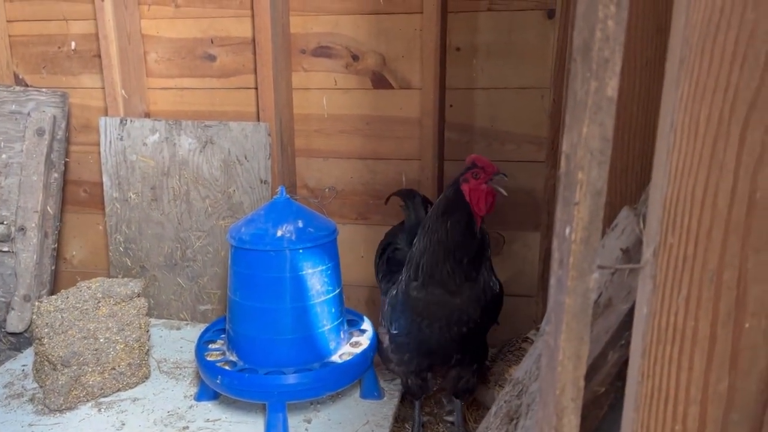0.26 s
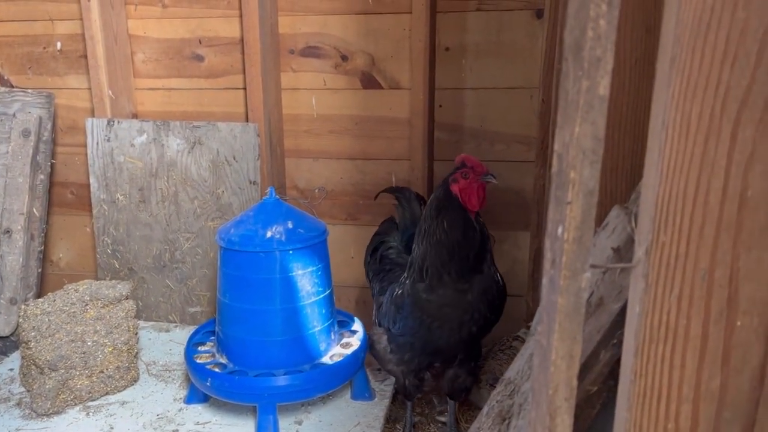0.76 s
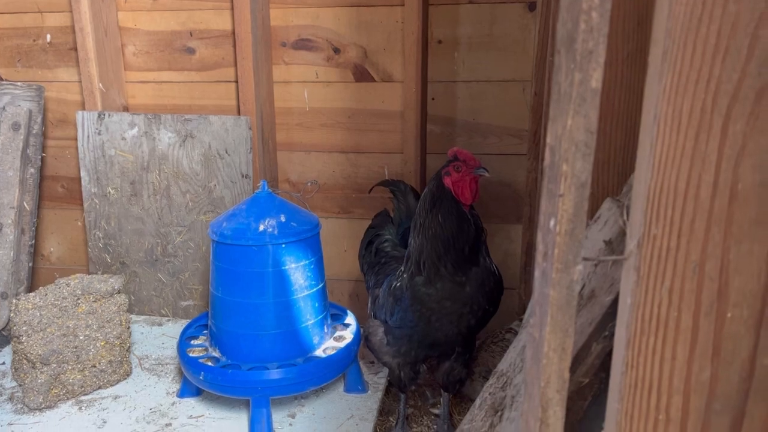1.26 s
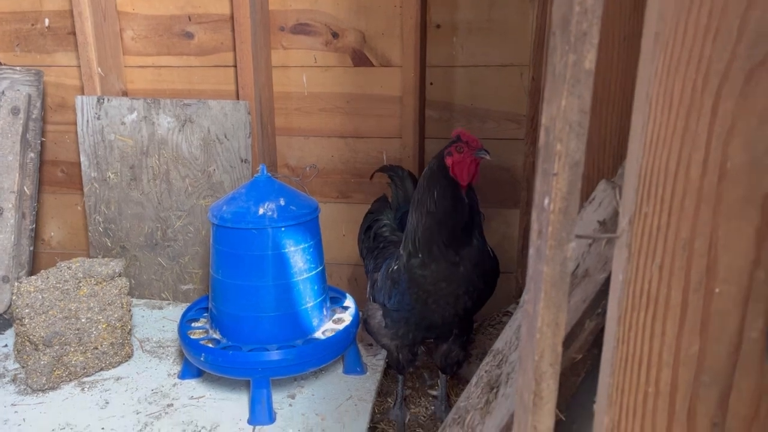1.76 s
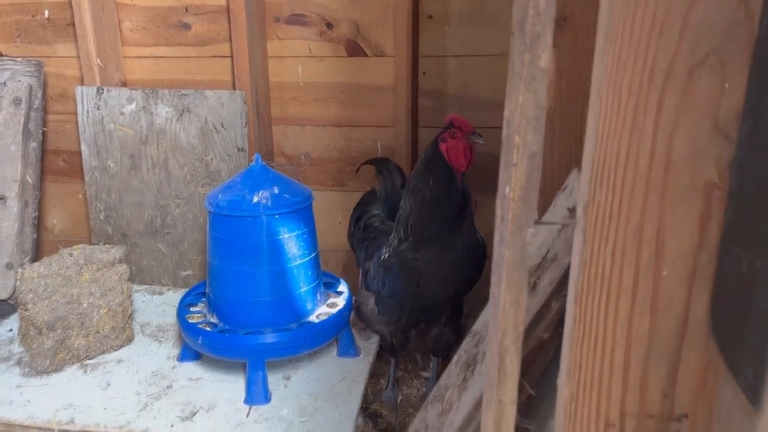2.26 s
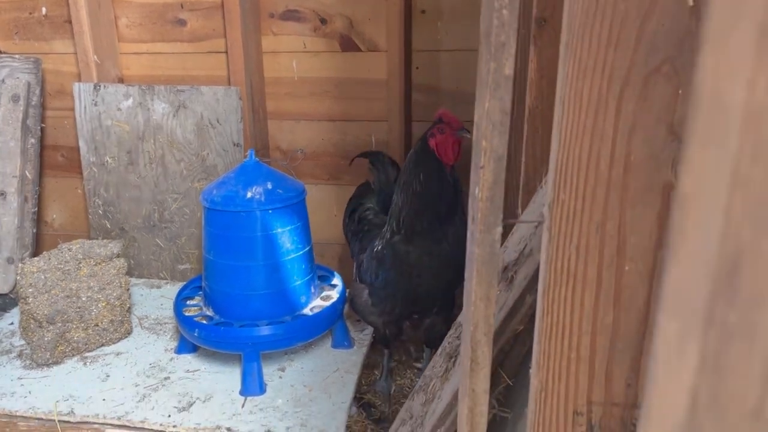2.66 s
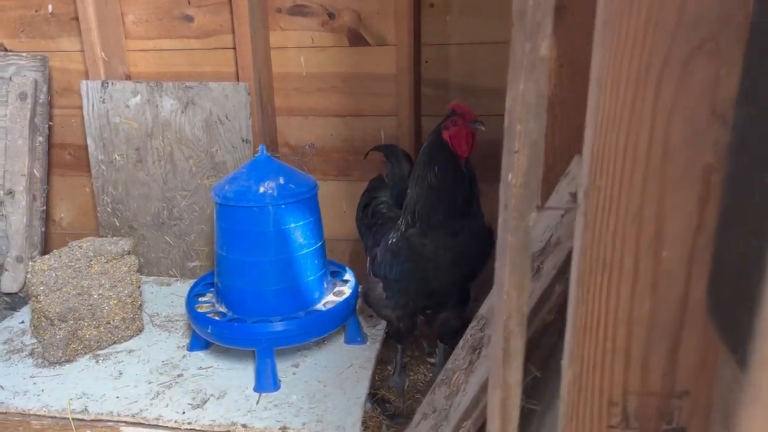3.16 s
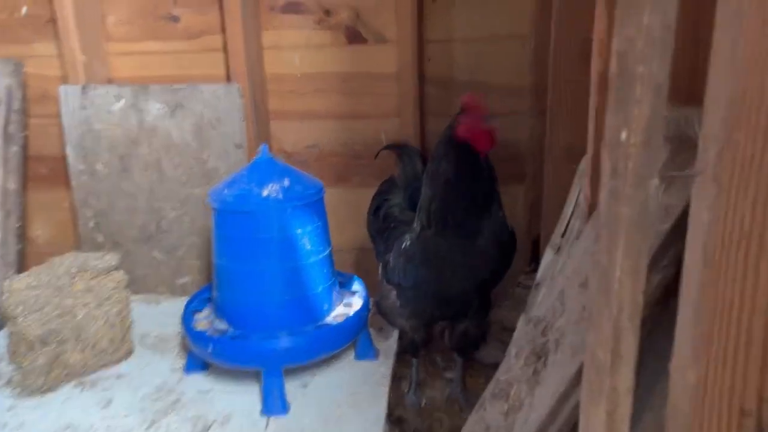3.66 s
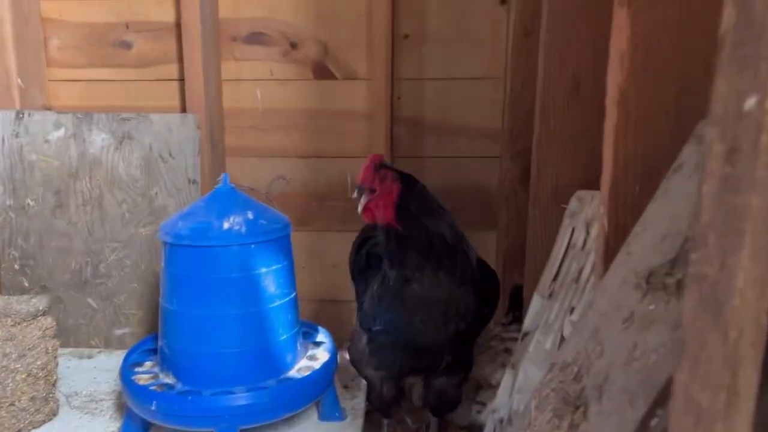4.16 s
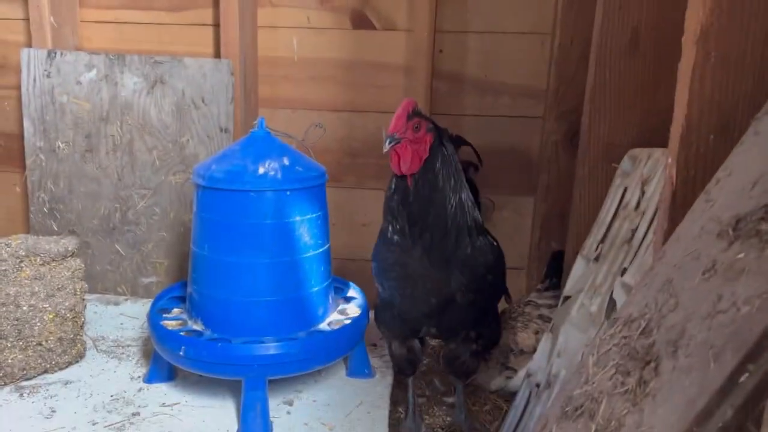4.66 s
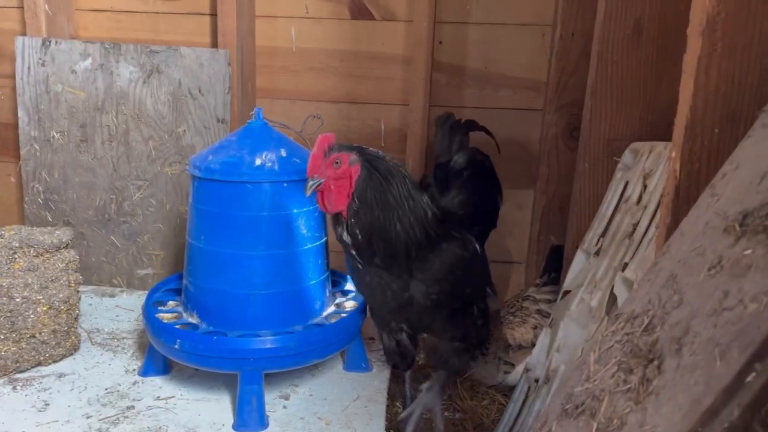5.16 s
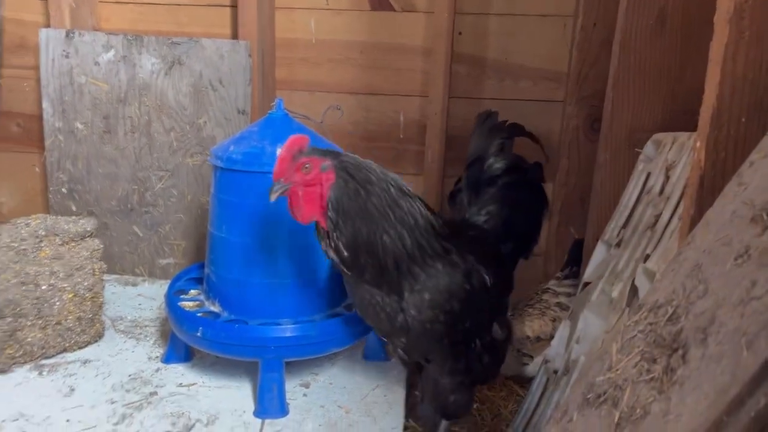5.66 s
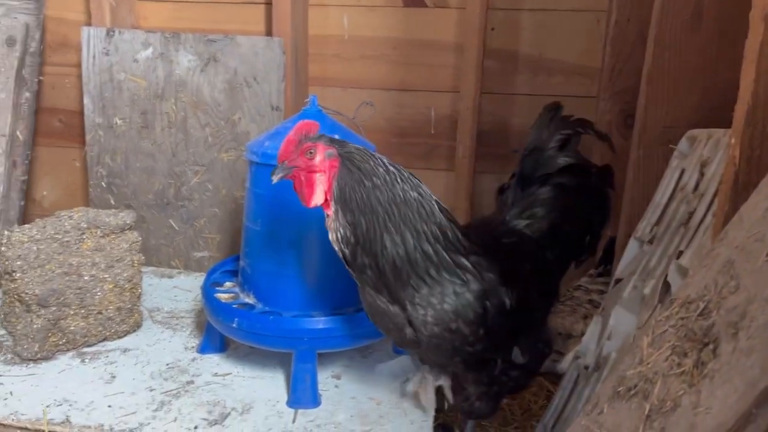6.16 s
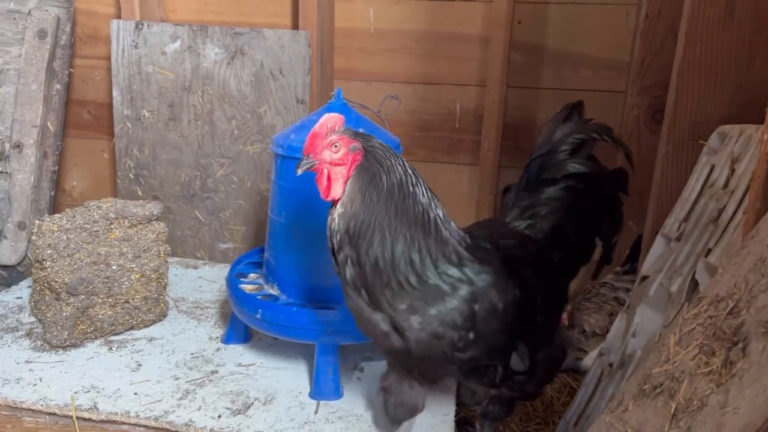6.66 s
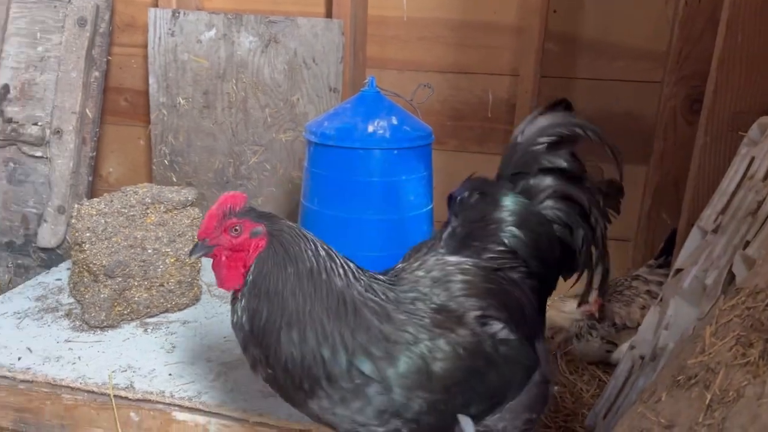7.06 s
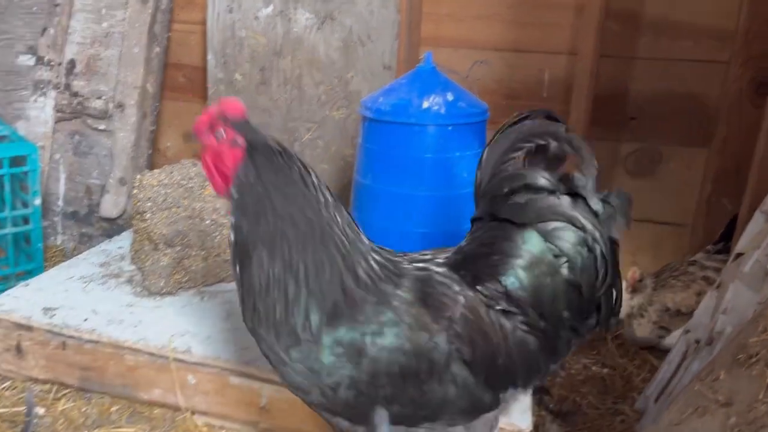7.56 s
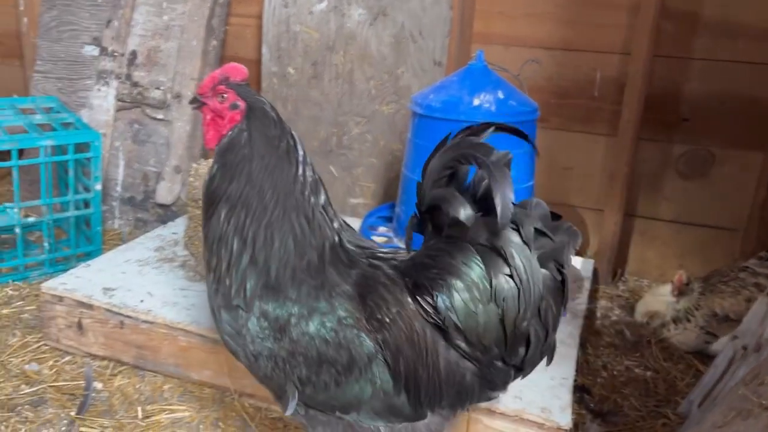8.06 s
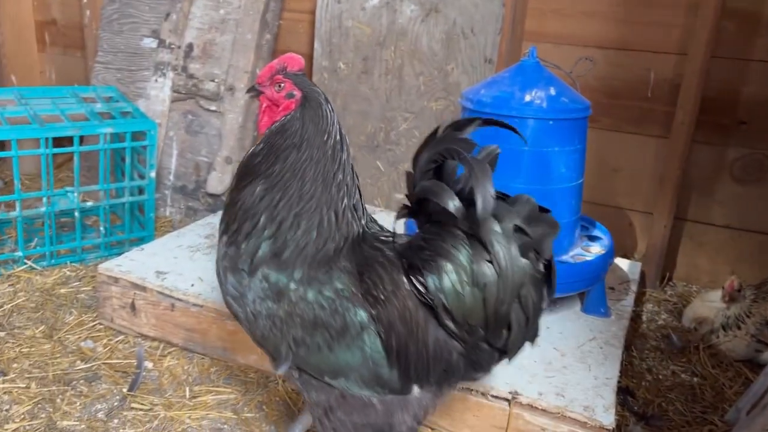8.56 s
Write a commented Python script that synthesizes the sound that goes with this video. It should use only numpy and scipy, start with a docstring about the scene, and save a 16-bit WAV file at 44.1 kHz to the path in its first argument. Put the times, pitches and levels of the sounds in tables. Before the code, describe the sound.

A rooster in a small wooden coop gives low pulsed clucks and five loud alarm squawks, with soft thuds and litter rustle between.

```python
"""A rooster sounds his alarm in a small plank coop: a low pulsed cluck, then a loud squawk that scoops up,
holds a clear note and breaks into a croak. In the pause boards thud, litter rustles and far birds call thinly.
Clucks lead into four more squawks, with claw ticks and footfalls between; thuds and rustle close.
Voice: pulse trains through throat filters and summed partials. Footing: noise bursts and ringing boards.
Background: filtered noise, random snaps and gliding sines. Coop: echoes, resonances and a diffuse tail."""
import sys
import numpy as np
from scipy import signal
from scipy.fft import rfft, irfft
from scipy.io import wavfile

SR = 44100
rng = np.random.default_rng(int(sys.argv[2]) if len(sys.argv) > 2 else 0)


def inscribe(sig):
    """Save sig as 16-bit PCM at rate SR to the path in sys.argv[1].

    A 1-D sig is mono; a 2-D sig holds one channel per row.
    Samples are clipped to [-1, 1] before scaling.
    """
    pcm = np.round(np.clip(np.atleast_2d(sig).T, -1, 1) * 32767)
    wavfile.write(sys.argv[1], SR, pcm.astype(np.int16))


N = 387638  # samples


def from_db(db):
    """Amplitude factor of a level in dB."""
    return 10 ** (np.asarray(db) / 20)


def rms_one(x):
    """Scale to rms 1."""
    return x / np.sqrt(np.mean(x ** 2) + 1e-20)


def at_hz(points, hz):
    """Read a table on a log-frequency axis."""
    f, value = np.transpose(points)
    return np.interp(np.log(np.maximum(hz, 1)), np.log(f), value)


def colour(x, spectrum):
    """Causal minimum-phase filter that follows a spectrum and falls away below it; rms 1."""
    size = 2048
    hz = np.arange(size + 1) * SR / (2 * size)
    low_cut = np.clip(hz / spectrum[0][0], .05, 1) ** 2
    gain = from_db(at_hz(spectrum, hz)) * low_cut
    cepstrum = irfft(np.log(gain))[:size]
    cepstrum[1:] *= 2
    response = irfft(np.exp(rfft(cepstrum, 2 * size)))[:size]
    return rms_one(signal.fftconvolve(x, response)[:len(x)])


def wander(n, knots_per_s):
    """Random motion of rms 1: straight lines between random knots."""
    knots = np.arange(n) * knots_per_s / SR
    return rms_one(np.interp(knots, np.arange(n), rng.standard_normal(n)))


def filtered(x, order, hz, kind):
    """Butterworth filter."""
    return signal.sosfilt(signal.butter(order, hz, kind, fs=SR, output="sos"), x)


def resonate(x, hz, width_hz):
    """Two-pole resonance with gain 1 at its centre."""
    r = np.exp(-np.pi * width_hz / SR)
    zeros = np.array([1, 0, -1]) * (1 - r * r) / 2
    poles = [1, -2 * r * np.cos(2 * np.pi * hz / SR), r * r]
    return signal.lfilter(zeros, poles, x)


def stereo_noise(n, width):
    """White noise, alike in both ears in the bass and less related above."""
    mid, side = rng.standard_normal((2, n))
    side = filtered(side, 1, 450, "high")
    return (mid + width * side * [[1], [-1]]) / np.sqrt(1 + width ** 2)


def add(out, start_s, sound, pan_db=0):
    """Mix a mono or stereo sound into both channels; positive pan is left."""
    i = round(start_s * SR)
    sound = sound[..., max(-i, 0):N - i]
    out[:, max(i, 0):max(i, 0) + sound.shape[-1]] += sound * from_db([[pan_db / 2], [-pan_db / 2]])


# decay time of the coop's tail: (frequency [Hz], T60 [s])
COOP_DECAY = [(100, 0.57), (600, 0.43), (2000, 0.37), (5000, 0.31), (14000, 0.3)]


def coop(x, tail_db, build_s=0.021):
    """A short diffuse tail, its bands dying at different rates."""
    t = np.arange(int(.7 * SR)) / SR
    noise = stereo_noise(len(t), width=0.94)
    edges_hz = np.geomspace(80, 16000, 9)
    tail = np.zeros_like(noise)
    for band in zip(edges_hz, edges_hz[1:]):
        t60_s = at_hz(COOP_DECAY, np.sqrt(np.prod(band)))
        tail += filtered(noise, 2, band, "band") * from_db(-60 * t / t60_s)
    response = from_db(tail_db) * rms_one(tail * np.minimum(1, t / build_s)) / np.sqrt(len(t))
    return x + signal.fftconvolve(x, response, axes=1)[:, :N]


# standing waves between the walls: (frequency [Hz], width [Hz], level [dB])
STANDING_WAVES = [(249, 66, -2), (457.3, 90, -8), (516, 11, -5), (620, 40, -3.5), (830, 10, -5.5),
                  (978, 66, -3.5), (1777, 39, -4.5)]
# echoes off the nearest planks: (left delay [s], right delay [s], level [dB])
PLANK_ECHOES = [(.0021, 0.0025, -3), (.0053, 0.0049, -6.5), (.0088, 0.011, -12)]


def planks(x, scatter_db=-5, scatter_s=0.037):
    """Plank echoes, scatter off the clutter and standing waves smear every short sound."""
    t = np.arange(SR // 5) / SR
    scatter = stereo_noise(len(t), width=0.36) * np.exp(-t / scatter_s) * np.minimum(1, t / 0.0065)
    scatter = filtered(scatter, 1, 700, "high")  # low notes pass the clutter by
    response = from_db(scatter_db) * rms_one(scatter) / np.sqrt(len(t))
    for hz, width_hz, db in STANDING_WAVES:
        response += from_db(db) * resonate(signal.unit_impulse(len(t)), hz, width_hz)
    for left_s, right_s, db in PLANK_ECHOES:
        response[[0, 1], [round(left_s * SR), round(right_s * SR)]] += from_db(db)
    return x + signal.fftconvolve(x, response, axes=1)[:, :N]


# calls of birds further off:
# (start [s], length [s], first pitch [Hz], last pitch [Hz], level [dB], quaver [rms share of pitch])
FAR_CALLS = [(0.548, 0.22, 2640, 3270, -71.5, 0.095), (1.048, 0.064, 2110, 2000, -75, 0.019),
             (1.204, 0.17, 2185, 2820, -71.5, 0.1), (1.323, 0.24, 3010, 2430, -72, .08),
             (2.8, 0.11, 3066, 3560, -74, 0.034), (4.861, 0.16, 2060, 1936, -63.5, 0.0077),
             (5.004, 0.34, 2500, 3176, -62.5, 0.092), (8.6, 0.11, 3350, 2695, -66, 0.025)]


def far_birds():
    """Thin sine glides whose pitch quavers at random."""
    out = np.zeros((2, N))
    for start_s, length_s, first_hz, last_hz, db, quaver in FAR_CALLS:
        n = int(length_s * SR)
        pitch_hz = np.linspace(first_hz, last_hz, n) * (1 + quaver * wander(n, 490))
        swell = np.sqrt(2 * np.hanning(n))
        add(out, start_s, from_db(db) * swell * np.sin(2 * np.pi * np.cumsum(pitch_hz) / SR))
    return out


# stirring, set in the pauses between calls, before trims:
# groups of (time [s], rumble level [dB], rustle level [dB])
STIRRING = [
    [(0.6, -77, -74.5), (0.986, -79, -81.5), (1.6, -77.5, -79.5)],
    [(2.65, -69, -79), (3.13, -67, -69), (3.8, -72, -70.5)],
    [(4.9, -74.5, -70.5), (5.16, -78, -73.5), (5.45, -67, -67)],
    [(6.3, -72, -73.5), (6.644, -64.5, -62.5), (7.2, -73, -66)],
    [(8.15, -66.5, -66), (8.304, -62.5, -77), (8.79, -73.5, -69.5)],
]


def stirring_db(column):
    """Level curve of one kind of stirring, straight between its points."""
    curve = np.vstack(STIRRING)
    return np.interp(np.arange(N) / SR, curve[:, 0], curve[:, column])


def bed(spectrum, width, flicker_db, flicker_per_s):
    """Coloured stereo noise whose level flickers."""
    mid, side = (colour(rng.standard_normal(N), spectrum) for _ in range(2))
    return (mid + width * side * [[1], [-1]]) * from_db(flicker_db * wander(N, flicker_per_s))


# colour of the rumble: (frequency [Hz], level [dB])
RUMBLE_COLOUR = [(15, -42), (25, -17.5), (55, -3), (107, -6), (321, -12), (484, -19.5), (605, -17),
                 (730, -25.5), (852, -32.5), (1500, -26), (1950, -60), (3300, -120)]


def rumble():
    """Stirring in the coop as flickering low noise."""
    noise = bed(RUMBLE_COLOUR, width=.3, flicker_db=3.0, flicker_per_s=22)
    return from_db(stirring_db(1) + 4) * noise


# colour of the litter: (frequency [Hz], level [dB])
RUSTLE_COLOUR = [(470, -36.5), (800, -3), (4270, -2.5), (7180, -11), (8550, -37.5), (9440, -10),
                 (11900, -10.5), (14400, -14), (15500, -52.5)]
STRAWS_PER_S, STRAW_SPREAD_DB, STRAW_DB = 280, 6, -3.5  # rate before clumping; level relative to rustle


def straws():
    """Straws crackle: tiny snaps of uneven size, in clumps."""
    rate_per_s = STRAWS_PER_S * from_db(6 * wander(N, 12))
    snaps = rng.random((2, N)) < rate_per_s / SR
    sizes = from_db(STRAW_SPREAD_DB * np.minimum(rng.exponential(1, (2, N)), 4))
    left, right = snaps * sizes * rng.choice([-1, 1], (2, N))
    ears = [colour(left + .5 * right, RUSTLE_COLOUR), colour(right + .5 * left, RUSTLE_COLOUR)]
    return from_db(STRAW_DB) * np.array(ears)


def rustle():
    """Litter rustles as flickering noise plus straw snaps."""
    noise = bed(RUSTLE_COLOUR, width=.7, flicker_db=2.0, flicker_per_s=35)
    return from_db(stirring_db(2) - 0.2) * (noise + straws())


def burst(n_s, spectrum, rise_s, decay_s):
    """Contact as a burst of coloured noise that dies away."""
    t = np.arange(n_s) / SR
    noise = colour(rng.standard_normal(len(t)), spectrum)
    return noise * (1 - np.exp(-t / rise_s)) * np.exp(-t / decay_s)


# claw ticks and snapping straw, before trim: (time [s], level [dB])
CLAW_TICKS = [(2.715, -42), (3.017, -39), (3.041, -39.5), (3.67, -39.5), (5.318, -30.5), (5.334, -26.5),
              (6.389, -25), (6.447, -24.5), (6.568, -35), (6.779, -40)]
# their colour: (frequency [Hz], level [dB])
CLAW_COLOUR = [(400, -10), (1200, -7.5), (2500, -2), (4000, 0), (6500, -12), (8500, -25), (11500, -16),
               (15500, -16)]


def ticks(trim_db=-8):
    """Each tick is a very short burst of noise."""
    out = np.zeros((2, N))
    for start_s, db in CLAW_TICKS:
        tick = burst(SR // 4, CLAW_COLOUR, rise_s=0.0023, decay_s=0.0046)
        add(out, start_s, from_db(db + trim_db) * tick)
    return out


# footfalls on the boards, before trims: (time [s], level [dB], board note [Hz])
FOOTFALLS = [(0.633, -47, 259), (2.719, -44, 119.4), (3.033, -41, 105), (3.192, -41, 150),
             (3.238, -41.5, 101), (5.228, -43.5, 199.2), (6.585, -41, 110.2), (6.649, -44, 58),
             (6.781, -36, 254), (7.1, -49.5, 59.25), (7.171, -47, 115.1), (8.14, -44, 150.3)]
# colour of the dull burst: (frequency [Hz], level [dB])
FOOTFALL_COLOUR = [(18, -34), (30, -7.5), (113, 2), (173, -6), (297, -6.5), (439, -24.5), (730, -17),
                   (846, -47), (996, -24.5), (1500, -25.5), (1950, -71.5), (3300, -120)]
BURST_DB, BOARD_RING_DB, BOARD_DECAY_S = -2.0, -3.5, .05


def boards():
    """A footfall gives a dull burst and rings a board's lowest note; little sounds below that note."""
    out, t = np.zeros((2, N)), np.arange(SR // 2) / SR
    for start_s, db, hz in FOOTFALLS:
        thud = burst(len(t), FOOTFALL_COLOUR, rise_s=0.0033, decay_s=.035)
        thud = filtered(thud, 2, hz / 2, "high")
        ring = np.sin(2 * np.pi * hz * t) * (1 - np.exp(-t / .009)) * np.exp(-t / BOARD_DECAY_S)
        add(out, start_s, from_db(db) * (from_db(BURST_DB) * thud + from_db(BOARD_RING_DB) * ring))
    return out


def syrinx(pitch_hz, jitter, air):
    """Membranes slap once a cycle, unevenly, and let through a puff of air; gives pulses and phase."""
    n = len(pitch_hz)
    uneven_hz = pitch_hz * (1 + jitter * wander(n, np.mean(pitch_hz)))
    phase = 2 * np.pi * np.cumsum(uneven_hz) / SR
    orders = np.arange(1, int(SR / 2 / pitch_hz.max()))[:, None]
    slaps = rms_one(np.cos(orders * phase).sum(0))
    puffs = rms_one(rng.standard_normal(n) * (1 + np.cos(phase)) ** 2)
    return slaps + air * puffs, phase


def beak(hz, centre_hz, boost_db, width_hz):
    """A resonance or hollow of the throat and open beak, in dB."""
    return boost_db / (1 + ((hz - centre_hz) / width_hz) ** 2)


# throat colour in a cluck: (frequency [Hz], level [dB])
CLUCK_COLOUR = [(150, -12), (235, -8), (320, -10.5), (450, -5), (620, 4), (900, -5), (1150, -5.5),
                (1450, -21), (2500, -21), (3300, -21.5), (4300, -36), (6500, -37.5), (8300, -60),
                (11000, -40.5), (15000, -56)]


def cluck(length_s, pulse_hz, beak_hz, boost_db, jitter=.05, air=0.77, dull_hz=1500, shut_db=8):
    """A short run of pulses; the beak opens and shuts, so the middle is highest and brightest."""
    u = np.linspace(0, 1, int(length_s * SR))
    arch = np.sin(np.pi * u ** 1.25).clip(0)
    hz = np.geomspace(150, 16000, 150)
    throat = np.c_[hz, at_hz(CLUCK_COLOUR, hz) + beak(hz, beak_hz, boost_db, width_hz=230)]
    pulses, _ = syrinx(pulse_hz * (.86 + .16 * arch), jitter, air * arch)
    voice = colour(pulses, throat)
    # the windpipe keeps ringing from one pulse to the next
    voice = rms_one(voice + from_db(1) * resonate(voice, 550, 150))
    dull = filtered(voice, 1, dull_hz, "low")
    bright = from_db(-shut_db * (1 - arch))
    envelope = (0.067 + arch) * np.minimum(1, (1 - u) * 20)
    return (dull * (1 - bright) + voice * bright) * envelope


# strain at the start of each note, sharp and mostly louder, eases on to the held pitch
STRAIN_S, EASE_S, STRAIN_UPPER_DB = .088, .014, 4.5
# a last push before the voice breaks
PUSH_S, PUSH_HZ, PUSH_DB = .02, 7, 3.5
WAVER_DB, WAVER_PER_S = 4.33, 14  # of the fundamental: rms, knots per s


def held_note(t, length_s, hz, sharp_hz, first_db, first_strain_db, octave_db, octave_strain_db, upper_db):
    """Strain, ease and push; gives pitch and levels of fundamental, octave and upper partials."""
    strain = (1 - np.tanh((t - STRAIN_S) / (2 * EASE_S))) / 2
    push = np.exp(np.minimum(t - length_s, 0) / PUSH_S)
    return (hz + sharp_hz * strain + PUSH_HZ * push,
            first_db + first_strain_db * strain + WAVER_DB * wander(len(t), WAVER_PER_S),
            octave_db + octave_strain_db * strain + PUSH_DB * push,
            upper_db + STRAIN_UPPER_DB * strain + PUSH_DB * push)


# throat colour of the held note: (frequency [Hz], level [dB])
HELD_COLOUR = [(1800, -4.5), (2100, -2.5), (2800, -5), (3500, -2.5), (4200, -14), (4900, -8.5), (5600, -17),
               (6400, -18), (7200, -28), (8300, -43.5), (9700, -27.5), (12000, -30), (14300, -37),
               (15500, -56)]
# the beak closes through the note: its resonance sinks and the top dulls
BEAK_OPEN_HZ, BEAK_SINK_HZ_PER_S, DULLING_DB_PER_OCTAVE_S = 2600, 1200, 9
UPPER_THROAT_HZ = 4640


def upper_partials(t, pitch_hz, orders, level_db, hollow_hz, ring_db):
    """Throat and beak shape the overtones above the octave."""
    hz = orders * pitch_hz
    beak_hz = BEAK_OPEN_HZ - BEAK_SINK_HZ_PER_S * t
    shape_db = at_hz(HELD_COLOUR, hz) + beak(hz, beak_hz, boost_db=6.0, width_hz=1000)
    shape_db += beak(hz, UPPER_THROAT_HZ, ring_db, width_hz=260)
    shape_db -= DULLING_DB_PER_OCTAVE_S * t * np.log2(orders)
    # the throat swallows one overtone, as its hollow moves a little
    moving_hz = hollow_hz + 80 * wander(len(t), 5)
    shape_db += beak(hz, moving_hz, boost_db=-12, width_hz=170)
    upper = from_db(shape_db)
    return upper * from_db(level_db) / np.sqrt((upper ** 2).sum(0))


def two_ears(partials, orders, phase, pitch_hz, late_ms, pan_db):
    """Gliding through standing waves, each overtone swells and turns differently at each ear."""
    n = len(phase)
    motion = np.array([[wander(n, 15) for _ in orders] for _ in range(2)])
    swell, turn = motion * np.minimum(1, orders / 4)
    ear = np.array([1, -1])[:, None, None] / 2
    lead = 2 * np.pi * pitch_hz * late_ms / 1000 + 1.1 * turn
    partials[2:] *= from_db(5 * np.tanh([wander(n, 18) for _ in orders[2:]]))
    # the throat delays each partial differently, which flattens the peaks
    spread = rng.uniform(0, 2 * np.pi, orders.shape)
    spread[:2, 0] = 0, np.pi / 2
    gain = from_db(ear * (pan_db / np.sqrt(orders) + 6.5 * swell))
    waves = partials * gain * np.cos(orders * phase + spread + ear * lead)
    return np.sqrt(2) * waves.sum(1) / np.sqrt((gain[:, 0] ** 2).mean(0))


# throat colours of the rough start and end: (frequency [Hz], level [dB])
SCOOP_COLOUR = [(700, -8), (1100, -2), (1450, -4), (1950, 2), (2400, -9), (3300, -2), (4100, -11),
                (5500, -16.5), (7000, -24), (8300, -43.5), (10000, -29.5), (12500, -35), (15500, -55)]
CROAK_COLOUR = [(300, -19), (470, -5), (640, 6.5), (780, -5.5), (1200, -10.5), (1650, -6.5), (2100, -15.5),
                (2500, -15.5), (3300, -19.5), (4200, -27.5), (5700, -31.5), (8300, -60), (11000, -47.5),
                (15500, -67)]


def squawk(start_s, break_s, scoop_db, rasp_db, croak_db, late_ms, *note,
           scoop_s=.042, scoop_drop=.26, croak_s=.036, croak_drop=0.2):
    """A rough scoop settles into a clean note, which collapses into a croak; gives tone and rough part."""
    length_s = break_s - start_s
    t = np.arange(int((length_s + croak_s) * SR)) / SR
    *voice, hollow_hz, ring_db, pan_db = note
    held_hz, first_db, octave_db, upper_db = held_note(t, length_s, *voice)
    scoop = np.clip(1 - t / scoop_s, 0, 1)
    broken = np.clip((t - length_s) / croak_s, 0, 1)
    pitch_hz = held_hz * (1 - scoop_drop * scoop ** 1.3 - croak_drop * broken ** .6)

    # the membranes are unsteady at first, lock in, and let go at the end
    unsteady = np.exp(-t / 0.051)
    let_go = np.minimum(1, broken * 4)
    jitter = .003 + .025 * unsteady + .05 * scoop + .1 * let_go
    pulses, phase = syrinx(pitch_hz, jitter, .55 * unsteady + .7 * let_go)

    orders = np.arange(1, 22)[:, None]
    first = from_db(first_db + (scoop_db - first_db) * np.minimum(1, scoop * 3))
    octave = from_db(octave_db) * (1 - scoop) ** 2
    upper = upper_partials(t, pitch_hz, orders[2:], upper_db, hollow_hz, ring_db) * (1 - scoop)
    partials = np.vstack([first, octave, upper])
    tone = two_ears(partials, orders, phase, pitch_hz, late_ms, pan_db)

    # air hisses between the partials, less as the note steadies
    puffs = rng.standard_normal(len(t)) * (1 + np.cos(phase))
    hiss = colour(puffs, SCOOP_COLOUR) * from_db(upper_db - 4.5) * (unsteady + 0.011)
    rasp = from_db(rasp_db) * np.minimum(1, scoop * 0.95) * colour(pulses, SCOOP_COLOUR)
    croak = from_db(croak_db) * let_go * np.sqrt(1 - broken ** 2) * colour(pulses, CROAK_COLOUR)
    attack = np.minimum(1, t / .014)
    flutter = from_db(5 * np.sqrt(unsteady) * (np.minimum(wander(len(t), 150), 1) - 0.35))
    return tone * flutter * (1 - let_go) * attack, (hiss + rasp + croak) * attack


# clucks: (start [s], length [s], level [dB], nominal pulse rate [Hz], beak resonance [Hz],
#          its boost [dB], left over right [dB])
CLUCK_CALLS = [(-0.025, 0.075, -20, 470, 1962, 13.5, 1.5), (1.641, 0.068, -26, 193.7, 1885, 20.5, -0.5),
               (1.862, 0.089, -20.5, 215.8, 1868, 21.5, 1.5), (2.417, 0.066, -27.5, 190.8, 1830, 19.5, 1),
               (3.827, 0.058, -28, 221.1, 1730, 16.5, 0.5), (4.056, 0.059, -16.5, 216.3, 2012, 17.5, -1.5),
               (4.614, 0.057, -20, 216.6, 2090, 19, -0.5), (5.478, 0.06, -19.5, 213.7, 2174, 17.5, -1.5),
               (5.709, 0.0532, -16, 228.8, 1994, 21, 0.5), (7.213, 0.058, -20, 211, 2162, 9.5, 1),
               (7.436, 0.05, -14.5, 270.9, 2082, 16.5, 2), (7.939, 0.065, -21.5, 214.6, 1947, 15.5, 0.5)]
# squawks: (start [s], voice breaks [s], scoop level [dB], rasp level [dB], croak level [dB],
#           right ear lag [ms], held pitch [Hz], sharp under strain [Hz],
#           fundamental level [dB], its strain gain [dB], octave level [dB], its strain gain [dB],
#           upper partials level [dB], throat hollow [Hz], upper throat resonance [dB],
#           left over right of the fundamental [dB])
SQUAWK_CALLS = [(0.043, 0.281, -12.5, -20.5, -13, -0.16, 692.1, 11.8, -21, 3, -28, 7.5, -22.5, 4200, 2.5, -2),
                (1.96, 2.186, -11, -18, -14, 0.28, 695, 22, -22.5, 5.5, -26, 10, -22.5, 4125, 5, -1.5),
                (4.159, 4.378, -9.5, -17.5, -15, 0.28, 692.2, 16.7, -17.5, -0.5, -21.5, 0.5, -23.5, 4200, -4, 0),
                (5.805, 6.024, -9.5, -16.5, -17, 0.25, 691, 32, -19, 8, -31, 0.5, -25, 3480, -3, 2.5),
                (7.532, 7.75, -7, -19, -16.5, -0.26, 686.7, 37.6, -17.5, 7, -28, -2, -25, 3560, -5.5, 3.5)]


def rooster():
    """The clear notes and the rough sounds of his voice, kept apart."""
    clear, rough = np.zeros((2, 2, N))
    for start_s, length_s, db, pulse_hz, beak_hz, boost_db, pan_db in CLUCK_CALLS:
        add(rough, start_s, from_db(db) * cluck(length_s, pulse_hz, beak_hz, boost_db), pan_db)
    for row in SQUAWK_CALLS:
        tone, rough_part = squawk(*row)
        add(clear, row[0], tone)
        add(rough, row[0], rough_part)
    return clear, rough


def scene():
    """The bird and his footing in the coop, over a faint background."""
    background = rumble() + rustle()
    clear, rough = rooster()
    # a standing wave just under the held note hums on after it
    clear = clear + from_db(-4) * resonate(clear + rough, 680, 6)
    short_sounds = from_db(-1.0) * planks(far_birds() + ticks() + boards() + rough)
    return background + coop(short_sounds, tail_db=-10) + coop(from_db(-1.22) * clear, tail_db=-11.0)


def record(dry, ceiling=.93, cutoff_hz=15600):
    """The loudest peaks are rounded and the top is cut steeply."""
    rounded = dry / (1 + (dry / ceiling) ** 6) ** (1 / 6)
    return signal.sosfilt(signal.ellip(10, .1, 80, cutoff_hz, fs=SR, output="sos"), rounded)


dry = scene()
out = record(dry)
inscribe(out)
```